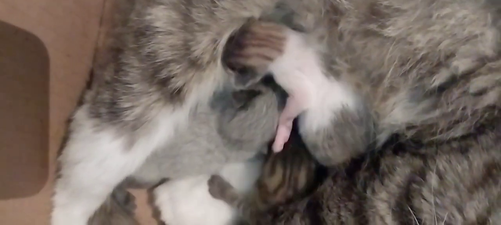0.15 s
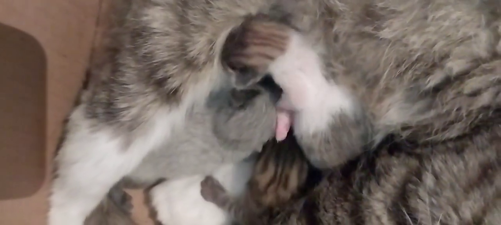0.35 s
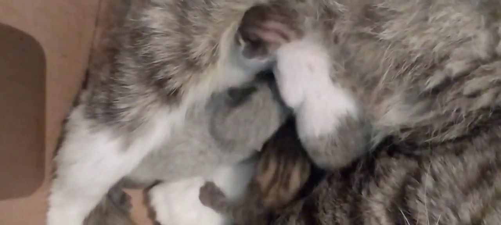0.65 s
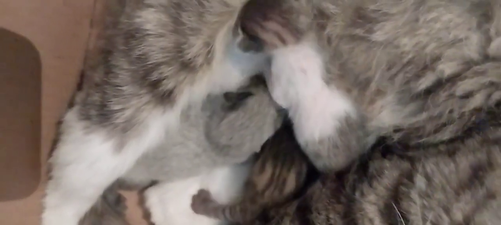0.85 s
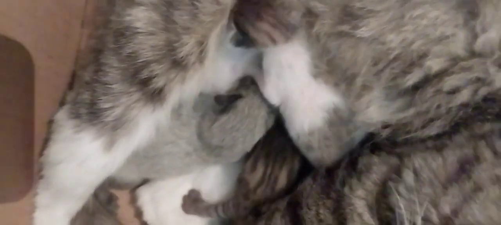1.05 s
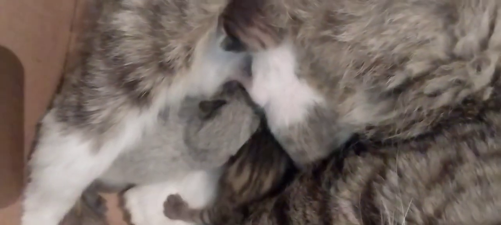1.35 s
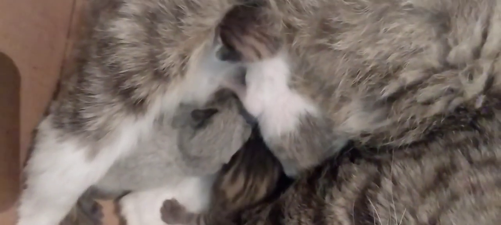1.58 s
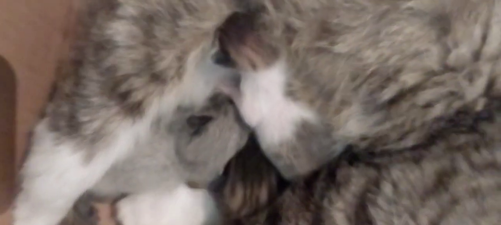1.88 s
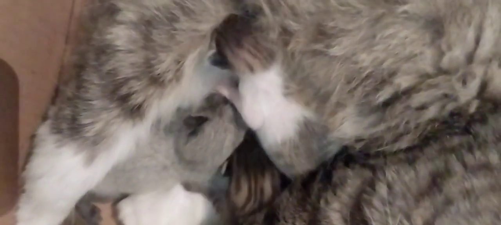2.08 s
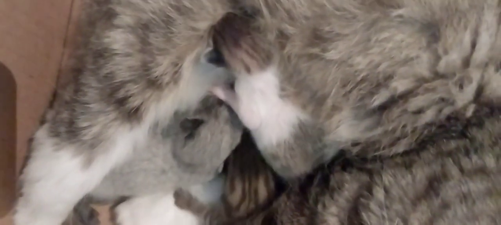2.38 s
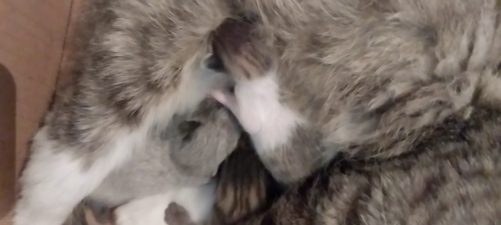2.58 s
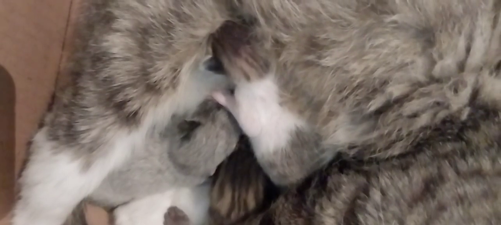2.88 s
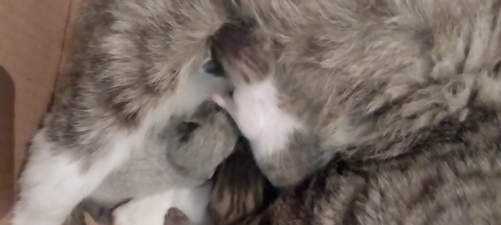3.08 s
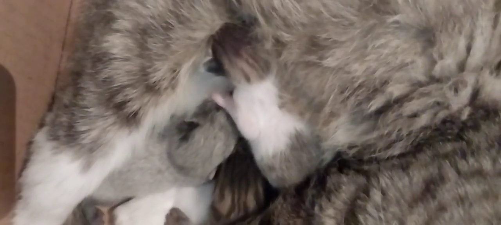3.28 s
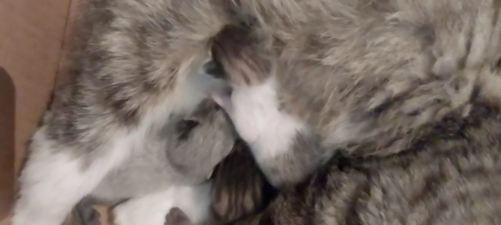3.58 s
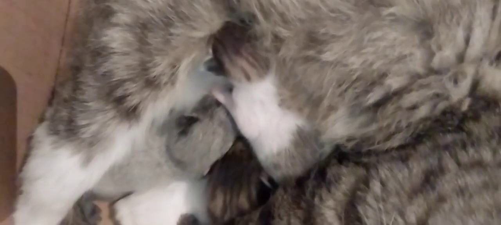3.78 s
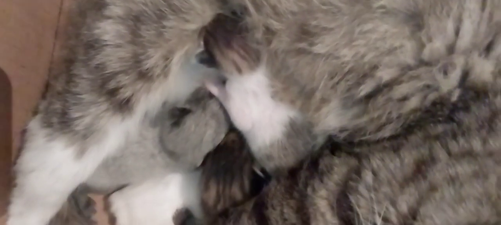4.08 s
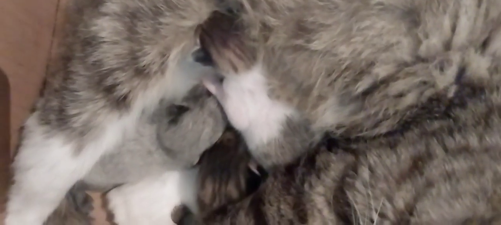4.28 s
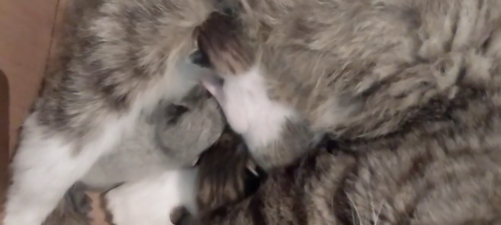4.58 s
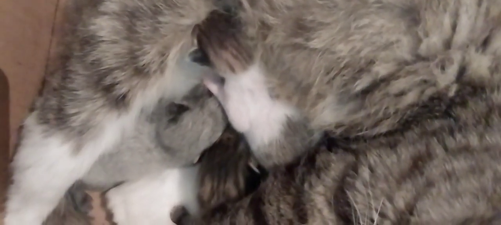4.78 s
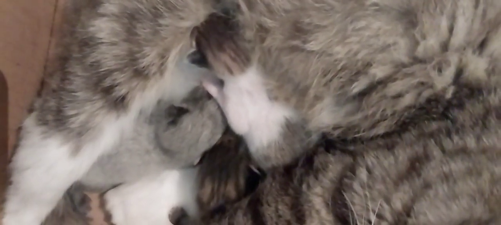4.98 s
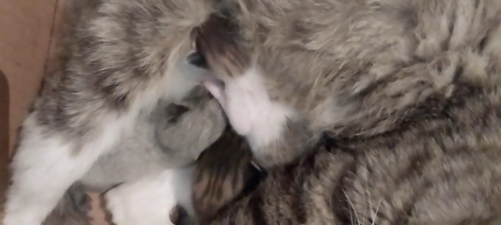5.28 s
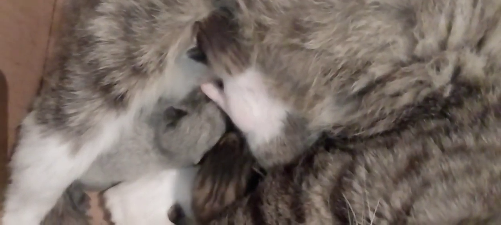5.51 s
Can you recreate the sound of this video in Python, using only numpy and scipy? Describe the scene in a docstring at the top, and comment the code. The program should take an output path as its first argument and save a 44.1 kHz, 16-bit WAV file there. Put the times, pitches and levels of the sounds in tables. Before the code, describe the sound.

Kittens wriggle against their purring mother in a box. Short airy fur swishes and papery crinkles arrive in irregular bursts, leaning left, over a soft throbbing purr and muffled cardboard booms. Bright little claw ticks dot the whole stretch; small wet smacks come about midway, and a paw knocks the box later. The ending is calmer. Quiet room, close microphones, slight hiss and faint low hum.

```python
"""Fur hisses and bedding crinkles over a purr of about 27 pulses a second; claws snap and lips smack.
A mother cat nurses wriggling kittens in a cardboard box, close to a pair of microphone ports.
Rubs are coloured noise in short random slips; box weight shifts are swells of low noise and scraping.
The purr is a train of uneven pulses ringing the chest, snaps are noise bursts, smacks ring a small mouth.
Quiet air, a faint hum and microphone hiss lie beneath."""
import sys
import numpy as np
from scipy import signal
from scipy.fft import rfft, irfft, next_fast_len
from scipy.io import wavfile

SR = 44100
rng = np.random.default_rng(int(sys.argv[2]) if len(sys.argv) > 2 else 0)


def bounce(signal):
    """Save signal as a 16-bit WAV file at the path given by the first command-line argument."""
    frames = np.transpose(np.atleast_2d(signal))
    limited = np.clip(frames, -1, 1)
    pcm = np.round(limited * 32767).astype(np.int16)
    wavfile.write(sys.argv[1], SR, pcm)


N = 249165

# Quiet air and hiss at the ports: (frequency [Hz], relative density [dB])
ROOM_SPECTRUM = [(18, -48), (30, 15.5), (98, -0.5), (199, 10), (461, -6.5), (666, -9.5), (3220, -28),
                 (4300, -51.5), (9220, -17), (12300, -43.5), (16000, -5)]
ROOM_DB = -76.5   # shared part, before the left/right balance
# Faint hum in the room: (frequency [Hz], relative level [dB], t60 [s])
HUM_MODES = [(65, -78.5, 0.34)]
# Paths off the box walls, one list per port: (delay [ms], relative level [dB])
WALL_PATHS = [
    [(.02, 47), (.62, 2.5), (1.4, -3.5), (2.7, -8.5)],
    [(.29, -4.5), (.9, -26), (1.9, -29), (3.3, -4)],
]

# Bodies rubbing along fur and bedding: (time at full level [s], rise [s], hold [s], fall [s],
# fur level [dB], bedding crinkle level [dB], crease level [dB])
RUBS = [(0.075, 0.12, 0.049, 0.085, -59.5, -93, -81.5), (0.16, 0.065, 0.011, 0.032, -42.5, -88, -70),
        (0.205, 0.08, 0.0023, 0.089, -36.5, -51.5, -57.5), (0.285, 0.06, 0.033, 0.027, -43, -49.5, -55.5),
        (0.294, 0.02, 0.0053, 0.029, -26, -60, -66), (0.335, 0.037, 0.1, 0.04, -53.5, -61, -67),
        (0.45, .02, 0.032, 0.11, -70.5, -77.5, -82), (0.548, 0.013, 0.013, 0.03, -64, -74.5, -76),
        (0.754, 0.095, 0.0024, 0.41, -69, -69, -64), (0.895, 0.13, 0.015, 0.065, -38, -51, -59),
        (0.935, 0.039, 0.047, 0.018, -37.5, -53, -61.5), (1.0, 0.017, 0.033, 0.17, -61, -62, -87),
        (1.13, 0.019, 0.061, 0.08, -67, -66.5, -87), (1.27, 0.086, 0.026, 0.062, -44.5, -53.5, -68.5),
        (1.32, 0.03, 0.014, 0.013, -42, -61, -70), (1.345, 0.0089, 0.023, 0.059, -38.5, -55, -64.5),
        (1.41, 0.039, .002, 0.14, -59, -67.5, -69.5), (1.5, 0.029, 0.12, 0.073, -65.5, -71, -79),
        (1.736, 0.086, 0.0035, 0.02, -36.5, -46.5, -60.5), (1.838, 0.22, 0.11, 0.087, -43, -48.5, -60.5),
        (1.925, 0.023, 0.036, 0.052, -40, -42.5, -49.5), (2.0, .02, 0.0017, 0.38, -67, -73.5, -82),
        (2.073, 0.004, 0.0123, 0.058, -47, -60.5, -86), (2.094, 0.021, 0.0087, 0.082, -36.5, -55, -73),
        (2.124, 0.041, 0.0049, 0.031, -35, -60.5, -80), (2.155, 0.047, 0.013, 0.02, -40.5, -57.5, -72.5),
        (2.44, 0.041, 0.06, .1, -62.5, -91, -102), (2.5, 0.021, 0.012, 0.068, -45, -61, -60),
        (2.58, 0.13, 0.0038, 0.1, -38, -54.5, -58.5), (2.62, 0.1, 0.084, 0.18, -48, -54.5, -60),
        (2.79, 0.066, 0.0018, 0.0076, -40, -58.5, -84), (2.879, 0.011, 0.0016, 0.089, -54, -62, -62.5),
        (3.047, 0.071, 0.065, 0.15, -48.5, -61, -77.5), (3.173, 0.13, 0.042, 0.18, -39.5, -52.5, -66.5),
        (3.3, 0.24, 0.081, 0.025, -78, -65.5, -93), (3.455, 0.01, 0.062, 0.017, -63.5, -64, -87.5),
        (3.6, 0.12, 0.12, .1, -56.5, -66, -84), (3.71, 0.1, 0.1, 0.16, -50, -57, -62),
        (3.729, .005, 0.014, 0.021, -37, -60, -74), (3.79, 0.059, 0.13, 0.015, -64.5, -72.5, -90),
        (4.125, 0.056, 0.023, 0.025, -45, -57, -74), (4.245, 0.1, 0.055, 0.041, -42.5, -52.5, -68.5),
        (4.353, 0.01, 0.088, 0.053, -44, -59, -67), (4.502, 0.03, .002, 0.13, -72, -70, -82),
        (4.538, 0.033, 0.0018, 0.083, -47, -61, -72), (4.657, 0.003, 0.071, 0.14, -66.5, -66.5, -84),
        (4.813, 0.23, 0.0013, 0.024, -55, -64, -80), (4.87, 0.17, 0.094, 0.22, -63, -79.5, -87),
        (5.055, 0.01, 0.024, 0.021, -62.5, -93, -86), (5.095, 0.0099, 0.016, 0.16, -63.5, -76, -81),
        (5.19, 0.11, 0.077, 0.035, -59.5, -67, -72.5), (5.295, 0.025, 0.059, 0.081, -55.5, -70, -69.5),
        (5.406, 0.0064, .002, 0.17, -50, -70.5, -69.5), (5.585, 0.0076, .002, 0.19, -63.5, -94, -79.5)]
# Share of each swell followed: (fur [ratio], crinkle [ratio], creases [ratio])
RUB_SWING = (1.0, 0.72, 0.78)
# Level between rubs: (fur [dB], crinkle [dB], creases [dB])
RUB_REST_DB = (-79, -90, -91)
SWELL_DB = 30   # climb over a full rise, and drop over a full fall
# Hiss of fur: (frequency [Hz], relative density [dB])
FUR_SPECTRUM = [(2940, -54), (5000, -11), (6130, -9.5), (7400, -5), (7950, -2), (8500, -7), (9100, -4.5),
                (10100, -2.5), (11700, 1), (13300, 2.5), (14900, -3), (16000, -3.5)]
# Crinkle of bedding: (frequency [Hz], relative density [dB])
BEDDING_SPECTRUM = [(1290, -40), (2200, -10.5), (2370, -6), (2560, -5), (2810, -5), (3180, -8), (3600, -8),
                    (4200, 0), (6000, -0.5), (7800, -12), (13200, -120)]
# Creasing of bedding: (frequency [Hz], relative density [dB])
CREASE_SPECTRUM = [(530, -16.5), (900, -12.5), (1140, -7.5), (1440, -9), (1630, -0.5), (1780, -8.5),
                   (2200, -11), (3200, -45)]
# Thin hiss joining the fur: (time at full level [s], rise [s], hold [s], fall [s], level over fur [dB])
SHEEN_SWELLS = [(4.87, 0.053, 0.7, 0.15, -4)]
# Band of that thin hiss: (frequency [Hz], relative density [dB])
SHEEN_SPECTRUM = [(11000, -60), (11950, -16), (12300, 0), (12650, -16), (13500, -60)]
# Crinkle turning duller or crisper: (time [s], lows up and highs down by [dB])
DULLNESS = [(0, -17), (.3, 9), (.9, 5.5), (1.15, -1.5), (1.8, 3), (2.3, 1.5), (2.85, 3), (3.1, -6),
            (3.7, 1.5), (4.2, -2.5), (4.7, -2.5), (5.1, 3.5), (5.65, -15)]
# Bodies shifting about on the left: (time [s], left over right [dB])
FUR_SIDE = [(.1, 0.5), (.3, 6), (1.1, 3), (1.35, 7.5), (1.65, 2), (2.1, 7.5), (2.35, 2.5), (2.6, 9),
            (2.9, 4.5), (4.3, 6), (4.55, 5), (4.9, 7)]

# Purring, breath by breath: (start [s], end [s], first pulse rate [Hz], last pulse rate [Hz],
# first level [dB], last level [dB])
BREATHS = [(0.046, 0.579, 28.05, 25.94, -59, -58.5), (0.6, 1.082, 26.5, 28.74, -77, -47),
           (1.104, 1.445, 28.57, 29.34, -54.5, -69.5), (1.456, 2.31, 26.85, 27.22, -55.5, -59.5),
           (2.332, 2.831, 29.32, 26.7, -57, -56.5), (2.865, 3.616, 27.16, 26.49, -57.5, -59.5),
           (3.67, 4.06, 27.76, 26.5, -44.5, -70.5), (4.15, 4.597, 26.56, 27.83, -65, -53.5),
           (4.664, 5.234, 29.67, 27.28, -63.5, -63), (5.226, 5.651, 25.27, 27.62, -53, -60.5)]
# Resonances of chest and box: (frequency [Hz], relative level [dB], t60 [s])
CHEST_MODES = [(201.8, 11.5, 0.12), (168, -8, 0.14), (215, 7.5, 0.014)]
BREATH_IN_S, BREATH_OUT_S, BREATH_EDGE_DB = 0.11, 0.046, 17.5   # each breath swells in and fades out

# Weight shifting on the box: (time at full level [s], rise [s], hold [s], fall [s],
# floor boom level [dB], sides boom level [dB], scrape level [dB])
SHIFTS = [(0.36, 0.3, .002, 0.23, -74, -49, -53.5), (0.42, 0.06, 0.0015, 0.086, -53, -50, -106),
          (0.635, 0.022, 0.036, 0.12, -74, -49.5, -59), (0.72, 0.067, 0.0018, 0.089, -40, -42.5, -53),
          (0.8, 0.37, 0.19, 0.061, -61, -48, -55), (0.975, .045, 0.0013, 0.17, -46.5, -60, -58.5),
          (1.29, 0.32, .002, 0.078, -56, -59.5, -63.5), (1.34, 0.094, 0.0027, 0.24, -60.5, -59.5, -58),
          (1.68, 0.087, .002, 0.067, -54, -53.5, -64), (1.72, 0.076, .002, 0.059, -39.5, -54, -80),
          (1.84, 0.37, 0.0018, 0.49, -57, -52.5, -65), (1.97, 0.28, 0.00196, 0.025, -65, -54, -59.5),
          (2.11, 0.076, 0.0019, 0.34, -86, -58, -91), (2.57, 0.15, 0.18, 0.19, -85, -64.5, -59),
          (3.15, 0.41, 0.0022, 0.87, -89, -64, -74), (3.26, 0.1, 0.0016, 0.17, -43.5, -46.5, -64.5),
          (3.51, 0.32, .002, 0.14, -51.5, -55.5, -75.5), (3.73, 0.29, 0.0017, 0.77, -48, -50.5, -63),
          (3.89, 0.15, 0.0073, 0.053, -53, -49.5, -64), (4.3, 0.2, 0.0018, 0.11, -78, -64, -61.5),
          (4.37, 0.034, .002, 0.086, -90, -66, -52), (4.42, 0.12, 0.0015, 0.46, -64.5, -51.5, -66),
          (4.85, 0.58, 0.37, 0.22, -77, -74, -75), (5.25, 0.65, 0.19, 0.29, -78, -93, -67.5)]
# Level between shifts: (floor [dB], sides [dB], scrape [dB])
SHIFT_REST_DB = (-80.5, -76, -90)
# Boom of the box floor: (frequency [Hz], relative density [dB])
FLOOR_SPECTRUM = [(18, -52.5), (42, -15), (66, 3.5), (85, -7), (150, -28), (400, -60)]
# Boom of the box sides: (frequency [Hz], relative density [dB])
SIDES_SPECTRUM = [(50, -50), (80, -19.5), (99, 4), (125, -5.5), (170, 3), (260, -9.5), (340, -15.5),
                  (570, -55)]
# Bodies scraping on cardboard: (frequency [Hz], relative density [dB])
SCRAPE_SPECTRUM = [(150, -5.5), (250, -5.5), (345, -9), (453, -11.5), (544, -11), (656, -5), (758, -15),
                   (950, -22.5), (1150, -20), (1750, -35)]
# A paw dropping on the box floor: (time [s], blow level [dB])
THUMPS = [(4.3695, -34.5), (4.389, -46.5)]
# Resonances of the struck box: (frequency [Hz], relative level [dB], t60 [s])
BOX_MODES = [(207, 0.5, 0.14), (232, -11.5, 0.35), (312, -4.5, 0.07), (394, -0.5, 0.033),
             (107.4, -21, 0.31), (695, -14, 0.0066)]

# Claws and creases snapping: (time [s], peak level before the ports [dB], centre [Hz])
SNAPS = [(0.253, -28.5, 10600), (0.2974, -26, 11500), (0.316, -39, 12000), (0.391, -43, 12000),
         (0.407, -33, 11000), (0.547, -44, 12000), (0.7521, -32, 11000), (0.754, -54, 3000),
         (0.8592, -35.5, 4500), (0.86, -40, 1600), (1.0507, -39, 12900), (1.1652, -31.5, 4500),
         (1.168, -45, 12500), (1.166, -50, 740), (1.229, -38.5, 4600), (1.339, -20.5, 11100),
         (1.468, -51, 4000), (1.534, -49.5, 2700), (1.5384, -46, 14000), (1.551, -46, 13800),
         (1.57, -41, 14000), (1.582, -45, 12600), (1.5993, -41, 13400), (1.612, -38.5, 13800),
         (1.625, -49, 13800), (2.496, -45, 2200), (2.578, -19.5, 11100), (2.7673, -27, 11000),
         (2.822, -35.5, 12300), (2.8774, -36.5, 6900), (2.876, -38, 11800), (3.17, -36, 13600),
         (3.49, -52, 4730), (3.492, -39.5, 13500), (3.573, -44, 6000), (3.706, -29.5, 12000),
         (3.7304, -23, 12400), (4.191, -43, 11600), (4.31, -34, 6000), (4.356, -32.5, 3660),
         (4.366, -21, 6600), (4.367, -32.5, 1530), (4.369, -20, 7700), (4.4812, -45, 11200),
         (4.4974, -28, 12500), (4.5051, -24.5, 12000), (4.534, -24, 11600), (4.536, -27, 11600),
         (4.6585, -36, 11700), (4.675, -35, 10800), (4.69, -36.5, 14000), (4.724, -35.5, 11800),
         (4.7626, -41, 7800), (4.801, -39, 11900), (4.811, -39.5, 11600), (5.097, -39, 12700),
         (5.184, -38.5, 4870), (5.269, -43.5, 10000), (5.3155, -33.5, 12300), (5.364, -37.5, 12200),
         (5.4033, -35, 8540), (5.4114, -30.5, 12300), (5.4326, -28.5, 12500), (5.467, -32, 12400),
         (5.5864, -33, 12100), (5.602, -42, 12200), (5.6188, -41.5, 12300)]
SNAP_RISE_S, SNAP_T60_S = 0.00024, 0.011
SNAP_SPREAD, SNAP_RING_WIDTH = 2.2, 1.08   # wide and narrow band edges: centre divided and multiplied by this
SNAP_RING_DB = -1.5                        # narrow band over wide band
TICK_HZ, TICK_RING_DB = 5200, 9.0          # snaps centred lower are ticks, and ring this much more

# Kittens' lips letting go of the teat: (time [s], relative level [dB])
SMACKS = [(2.8235, -29), (2.8465, -41), (2.876, -43), (2.894, -36), (2.905, -39)]
# Resonances of the small mouth: (frequency [Hz], relative level [dB], t60 [s])
MOUTH_MODES = [(2630, -6, 0.017), (2940, -8, 0.01), (1710, -8, 0.013), (1140, -9, 0.017),
               (4760, -5.5, 0.0044), (6160, -18, 0.0037)]

CUTOFF_HZ, ROLL_OFF_HZ = 16800, 16250   # stopband edges of the two low-pass filters


def from_db(db):
    """Gain of a level in dB."""
    return 10 ** (np.asarray(db) / 20)


def rms_one(x):
    """Scaled to rms 1."""
    return x / np.sqrt(np.mean(x ** 2) + 1e-20)


def white():
    """White noise in three parts: shared, left only, right only."""
    return rng.standard_normal((3, N))


def in_time(rows):
    """Columns of a table, joined by straight lines, at every sample."""
    s, *columns = np.transpose(rows)
    return [np.interp(np.arange(N) / SR, s, column) for column in columns]


def swells(rows, swing, rest_db):
    """Level in dB of each part: every row rises, holds and falls; powers add to a resting level."""
    t = np.arange(0, N + 32, 32) / SR   # every 32nd sample
    power = from_db(2 * np.array(rest_db))[:, None] + 0 * t
    for s, rise, hold, fall, *levels_db in rows:
        below_db = SWELL_DB * np.maximum(0, np.maximum((s - t) / rise, (t - s - hold) / fall))
        part_db = np.array(levels_db)[:, None] - np.outer(swing, below_db)
        power = power + from_db(2 * part_db)
    return [np.interp(np.arange(N) / SR, t, 10 * np.log10(p)) for p in power]


def drift(rate):
    """Slow chance: noise at every 20th sample through a double one-pole low-pass at rate Hz; spread 1."""
    r = np.exp(-40 * np.pi * rate / SR)
    noise = rng.standard_normal(N // 20 + 2002)
    slow = signal.lfilter([1], [1, -2 * r, r * r], noise)[2000:]   # start-up dropped
    return np.interp(np.arange(N) / 20, np.arange(len(slow)), rms_one(slow))


def colour(x, spectrum):
    """Gives white input the tabled spectrum; rms 1."""
    hz, db = np.transpose(spectrum)
    size = next_fast_len(N)
    bins = np.maximum(np.arange(size // 2 + 1) * SR / size, 1)
    gain = from_db(np.interp(np.log(bins), np.log(hz), db))
    return rms_one(irfft(rfft(x, size) * gain, size)[..., :N])


def band_pass(x, order, edges):
    """The part of x between two edges in Hz."""
    return signal.sosfilt(signal.butter(order, edges, "band", fs=SR, output="sos"), x)


def halves(x, hz):
    """The parts below and above hz."""
    return [signal.sosfilt(signal.butter(4, hz, kind, fs=SR, output="sos"), x) for kind in ("low", "high")]


def patchy(x, low_hz, high_hz, patchy_db, rate, count):
    """Splits x into narrow bands, each swelling and sinking on its own."""
    edges = np.geomspace(low_hz, high_hz, count + 1)
    out = 0
    for k, pair in enumerate(zip(edges, edges[1:])):
        out = out + (-1) ** k * band_pass(x, 2, pair) * from_db(patchy_db * drift(rate))
    return rms_one(out)


def slips(per_s, spread_db, t60, smooth):
    """Loudness of a stick-slip rub: sudden random slips that die away, over a steady share."""
    sizes = from_db(spread_db * np.minimum(rng.exponential(1, N), 3))
    sizes = sizes * (rng.random(N) < per_s / SR)
    dying = signal.lfilter([1], [1, -from_db(-60 / (t60 * SR))], sizes)
    return (smooth + rms_one(dying)) / (1 + smooth)


def blows(events):
    """One click for each (time [s], level [dB])."""
    clicks = np.zeros(N)
    for s, db in events:
        clicks[round(s * SR)] = from_db(db)
    return clicks


def ring(clicks, modes):
    """The input sets every mode ringing: a two-pole resonator each."""
    out = 0
    for hz, db, t60 in modes:
        r, w = from_db(-60 / (t60 * SR)), 2 * np.pi * hz / SR
        feed, poles = [0, from_db(db) * np.sin(w)], [1, -2 * r * np.cos(w), r * r]
        out = out + signal.lfilter(feed, poles, clicks + 1e-18)
    return out


def ports(x, pan_db, apart):
    """Each port hears x[0] by its own paths off the box walls; x[1:] are parts that reach one port only."""
    out = np.zeros((2, N))
    for side, paths in enumerate(WALL_PATHS):
        for k, (ms, db) in enumerate(paths):
            delayed = np.interp(np.arange(N) - round(ms * SR / 1000), np.arange(N), x[0])
            out[side] += (-1) ** k * from_db(db) * delayed   # signs alternate from path to path
        out[side] = rms_one(out[side]) * np.std(x[0]) + apart * x[1 + side]
    return out / np.sqrt(1 + apart ** 2) * from_db(np.outer([.5, -.5], pan_db))


def room():
    """Quiet air and microphone hiss as coloured noise, and a faint hum from a noise-driven resonance."""
    shared, left, right = colour(white(), ROOM_SPECTRUM)
    air = from_db(ROOM_DB) * (shared + 1.85 * np.array([left, right]))
    hum = ring(rng.standard_normal(N) * 0.0094, HUM_MODES)
    return (air + hum) * from_db([[1.5], [-1.5]])


def rustle():
    """Stick-slip of fur, bedding and creases: light contact crackles, firm contact is smooth."""
    fur_db, crinkle_db, crease_db = swells(RUBS, RUB_SWING, RUB_REST_DB)
    firm = np.clip((fur_db + 71.0) / 25, 0, 1)   # 0 light, 1 firm
    hairs = slips(130., spread_db=1.0, t60=0.0087, smooth=0.66)   # single hairs let go
    pelt = slips(300., spread_db=4.5, t60=0.0093, smooth=1.7) * from_db(1.95 * drift(29))
    rub = (1 - firm) * hairs + firm * pelt
    drag = slips(200., spread_db=11.5, t60=0.024, smooth=2.6 + 0.64 * firm)

    sheen = colour(white(), SHEEN_SPECTRUM) * from_db(swells(SHEEN_SWELLS, [1], [-30])[0])
    fur = patchy(colour(white(), FUR_SPECTRUM), 3080, 18430, patchy_db=3.0, rate=10.5, count=16)
    fur = fur + sheen * from_db(1.6 * drift(17))

    crinkle = patchy(colour(white(), BEDDING_SPECTRUM), 1340, 9550, patchy_db=3.5, rate=10.8, count=12)
    dull, crisp = halves(crinkle, 3200)
    tone_db = in_time(DULLNESS)[0] + 2.0 * drift(52)
    bedding = (dull * from_db(tone_db) + crisp * from_db(-tone_db)) * from_db(crinkle_db)
    creases = colour(white(), CREASE_SPECTRUM) * from_db(crease_db)

    brushed = ports(rub * fur * from_db(fur_db), in_time(FUR_SIDE)[0], apart=1.0)
    pressed = ports(np.sqrt(rub * drag) * bedding + drag * creases, np.full(N, 4.5), apart=1.0)
    return from_db(1.0) * (brushed + pressed)


def purr():
    """The larynx snaps about 27 times a second; each soft pulse, a little uneven, rings chest and box."""
    pulses, t, level = np.zeros(N), np.arange(N) / SR, np.zeros(N)
    jitter_s, uneven_db = 0.00091 * drift(42), 1.0 * drift(24)
    for start, end, first_hz, last_hz, first_db, last_db in BREATHS:
        on = (t >= start) & (t < end)
        rate_hz = first_hz + (last_hz - first_hz) * (t - start) / (end - start)
        cycles = np.cumsum(on * rate_hz) / SR
        at = np.flatnonzero(np.diff(np.ceil(cycles)) > 0)   # one pulse as each cycle begins
        jittered = np.clip(at + (jitter_s[at] * SR).astype(int), 0, N - 1)
        pulses[jittered] = from_db(uneven_db[at])
        edge = np.maximum(0, np.maximum(1 - (t - start) / BREATH_IN_S, 1 - (end - t) / BREATH_OUT_S))
        breath_db = np.interp(t, [start, end], [first_db, last_db]) - BREATH_EDGE_DB * edge
        level = np.maximum(level, from_db(breath_db))
    soft = band_pass(pulses, 2, [130, 280])
    breathy = 0.00012 * rng.standard_normal(N)   # air between the pulses keeps the chest murmuring
    return rms_one(ring(soft + breathy, CHEST_MODES)) * level * from_db([[.7], [-.7]])


def box():
    """Shifting weight shakes the cardboard: floor and sides boom, bodies scrape along it, a paw thumps."""
    floor_db, sides_db, scrape_db = swells(SHIFTS, [1, 1, 1], SHIFT_REST_DB)
    shared, left, right = colour(white(), FLOOR_SPECTRUM) * from_db(floor_db)
    floor = (shared + 0.068 * np.array([left, right])) * from_db([[2.5], [-4.5]])
    shared, left, right = colour(white(), SIDES_SPECTRUM) * from_db(sides_db)
    sides = shared + 0.28 * np.array([left, right])

    scrape = patchy(colour(white(), SCRAPE_SPECTRUM), 117.6, 1900, patchy_db=1.5, rate=7.1, count=8)
    scrape = scrape * slips(130.0, spread_db=-0.5, t60=0.03, smooth=1.95)
    scrape = ports(scrape * from_db(scrape_db), np.full(N, 10.5), apart=0.61)

    no_bass = signal.butter(2, 90, "high", fs=SR, output="sos")   # a small panel sends out no deep bass
    thump = signal.sosfilt(no_bass, ring(blows(THUMPS), BOX_MODES))
    return floor + sides + scrape + thump * from_db([[1.5], [-1.5]])


def snaps():
    """A claw or crease lets go: a fast-rising, short burst of noise, brightest around its centre."""
    out = np.zeros((3, N))
    noise, t = rng.standard_normal((len(SNAPS), 3, 2000)), np.arange(2000) / SR
    envelope = from_db(-60 * t / SNAP_T60_S) * (1 - np.exp(-t / SNAP_RISE_S))
    for (s, db, hz), burst in zip(SNAPS, noise):
        burst = burst * envelope
        wide = band_pass(burst, 3, [hz / SNAP_SPREAD, min(hz * SNAP_SPREAD, .45 * SR)])
        narrow = band_pass(burst, 1, [hz / SNAP_RING_WIDTH, hz * SNAP_RING_WIDTH])
        ring_db = SNAP_RING_DB + TICK_RING_DB * (hz < TICK_HZ)
        burst = rms_one(wide) + from_db(ring_db) * rms_one(narrow)
        at = round(s * SR)
        out[:, at:at + 2000] += (from_db(db) * burst / np.abs(burst).max())[:, :N - at]
    return ports(out, np.full(N, 5.5), apart=1.0)


def smacks():
    """Lips part: a wet, ragged click, dying away within a few milliseconds, rings the small mouth."""
    click = signal.lfilter([1], [1, -.96], blows(SMACKS))
    tear = click * rng.choice([-1, 1], (3, N)) * 0.17   # random signs make it ragged
    bright = halves(ring(tear, MOUTH_MODES), 1740)[1]
    return ports(bright, np.full(N, 5.5), apart=0.36)


def scene():
    """Everything that reaches the two ports."""
    return room() + rustle() + purr() + box() + snaps() + smacks()


def record(dry):
    """The microphone signal's top rolls off, then is cut."""
    rolled = signal.sosfilt(signal.cheby2(8, 27, ROLL_OFF_HZ, fs=SR, output="sos"), dry)
    return signal.sosfilt(signal.cheby2(12, 60, CUTOFF_HZ, fs=SR, output="sos"), rolled)


dry = scene()
out = record(dry)
bounce(out)
```